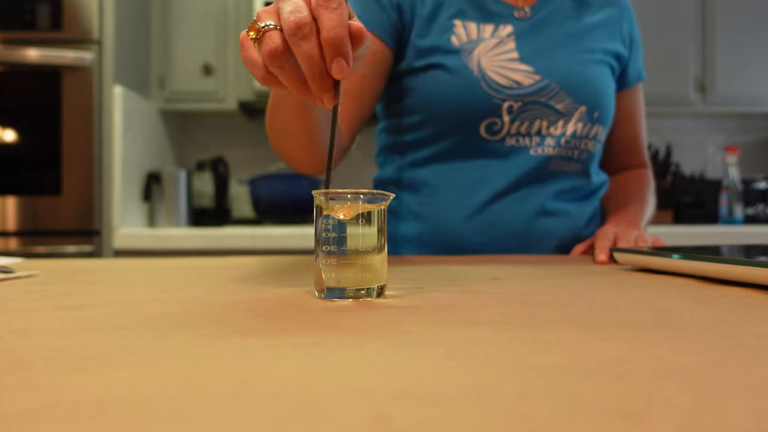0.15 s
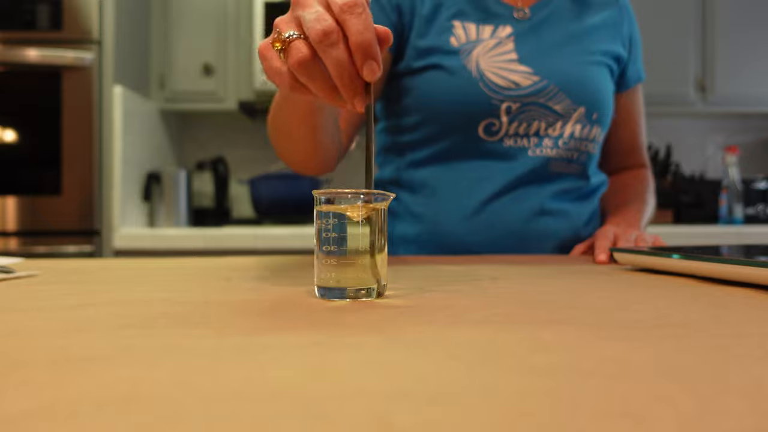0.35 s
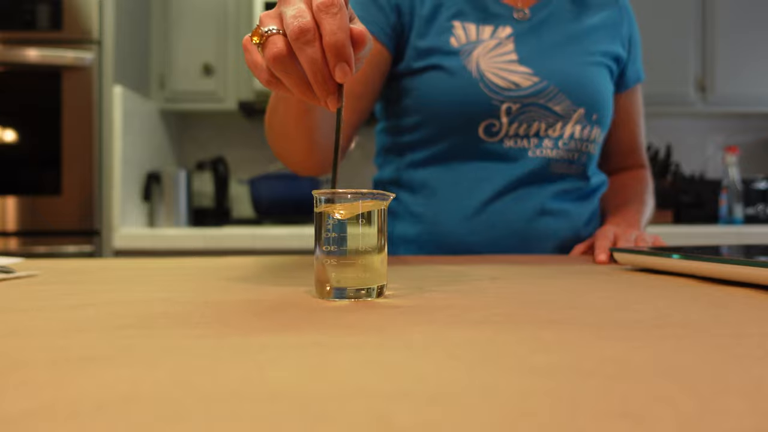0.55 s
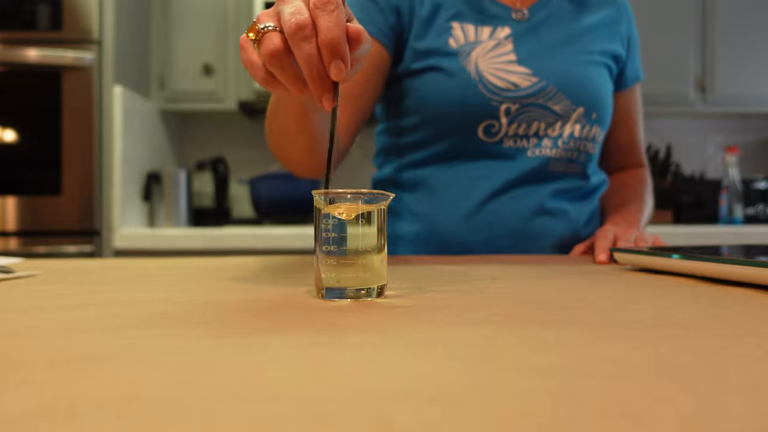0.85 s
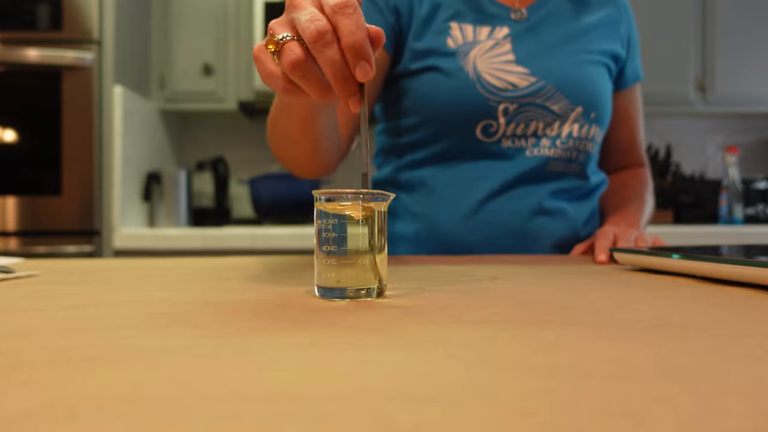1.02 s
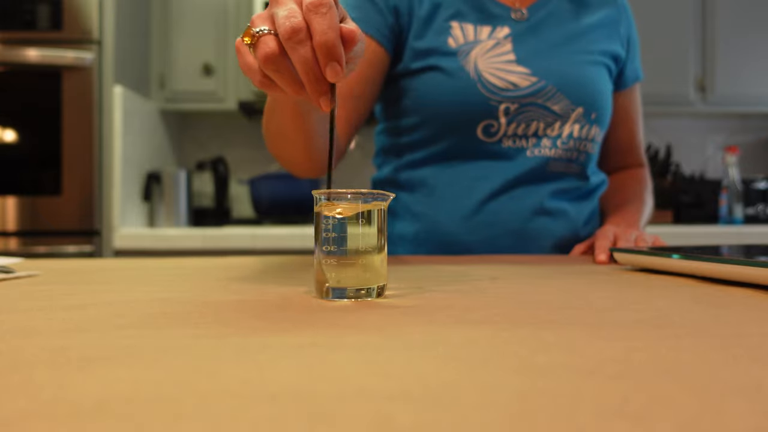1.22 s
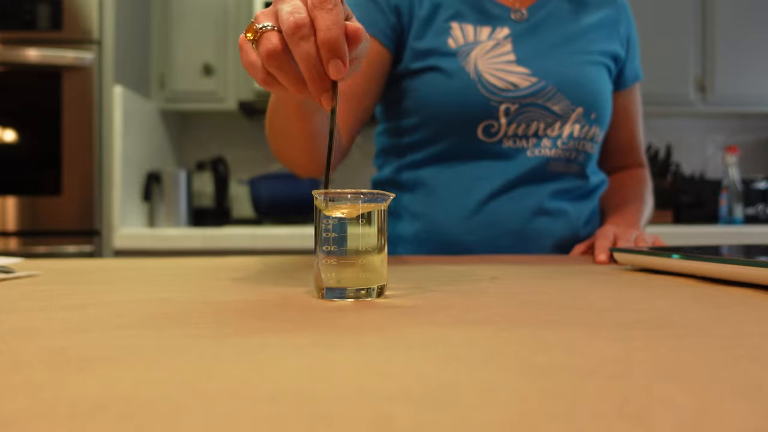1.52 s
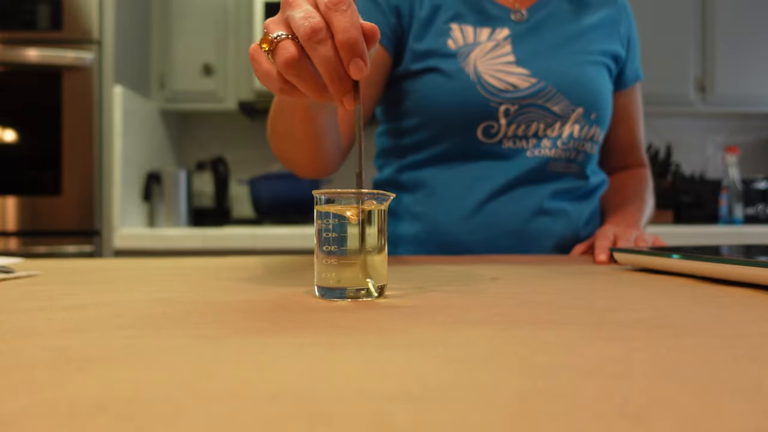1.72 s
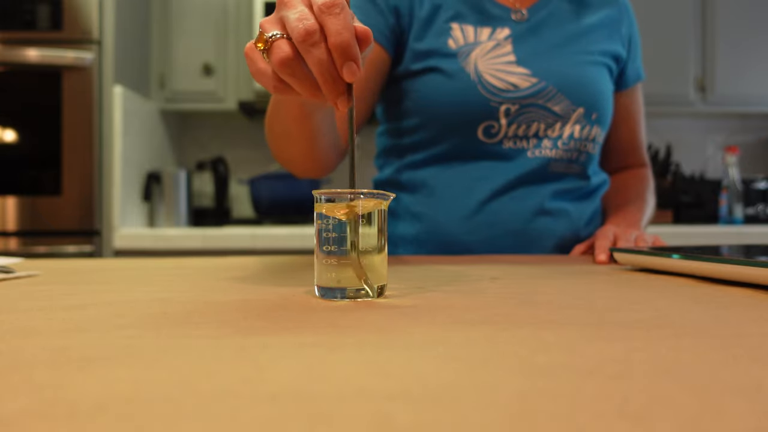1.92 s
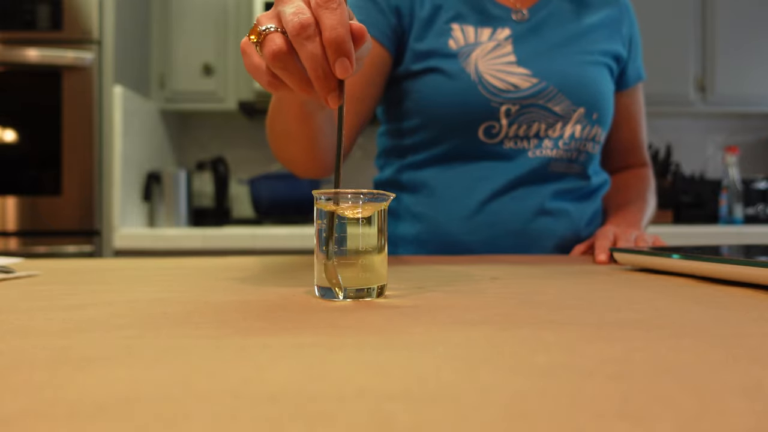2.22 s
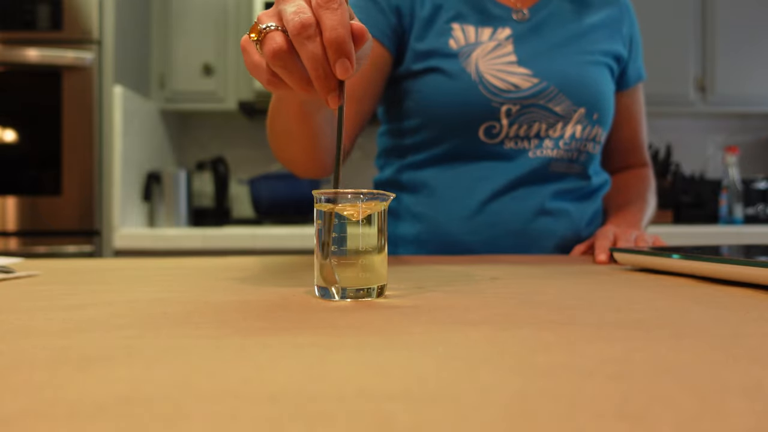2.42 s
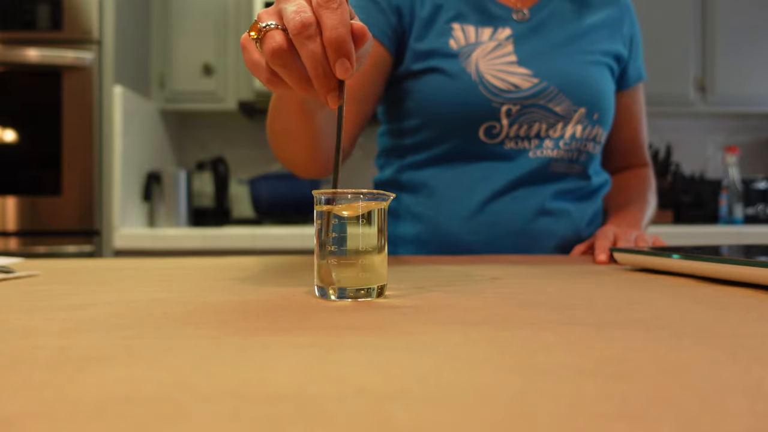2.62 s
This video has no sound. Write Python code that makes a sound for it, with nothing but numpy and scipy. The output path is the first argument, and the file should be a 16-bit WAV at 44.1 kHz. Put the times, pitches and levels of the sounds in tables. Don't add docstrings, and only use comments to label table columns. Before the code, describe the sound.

Thin metal rod clinking rapidly inside a small glass beaker of liquid while stirring, then faint ticks

```python
import sys
import numpy as np
from scipy import signal
from scipy.fft import rfft, irfft, next_fast_len
from scipy.io import wavfile
from scipy.ndimage import uniform_filter1d, map_coordinates

SR = 44100
rng = np.random.default_rng(int(sys.argv[2]) if len(sys.argv) > 2 else 0)


def gain_from_decibels(decibels):
    exponent = np.asarray(decibels, float) / 20
    return 10 ** exponent


def store_wav(level_fs):
    pcm = np.round(np.clip(np.atleast_2d(level_fs), -1, 1) * 32767)
    wavfile.write(sys.argv[1], SR, pcm.T.astype(np.int16))


N = 121275
LEAD = SR // 5

# start_s, wall_db, shoulder_db, rim_db, high_rim_db
EARLIER_CLINK = (-.03, -31, -32, -35, -38)
# start_s, wall_db, shoulder_db, rim_db, high_rim_db
CLINKS = [(0.1017, -24.5, -23, -34, -45), (.1055, -45, -25.5, -38, -44), (0.1758, -31, -37, -47, -48),
          (0.2073, -29.5, -24, -29, -32), (.2220, -16.5, -21, -20, -27.5), (0.2665, -20.5, -20.5, -21, -36),
          (0.2693, -17.5, -20, -14, -24), (.4402, -26, -23, -33, -37.5), (0.5543, -22.5, -23.5, -33, -31),
          (.5662, -17.5, -16.5, -14, -21.5), (.611, -26, -30, -24.5, -43), (.6157, -21.5, -29, -17.5, -35),
          (.7848, -17.5, -25.5, -24, -37), (0.8667, -40, -49, -45, -50), (0.8959, -21.5, -20.5, -39, -32.5),
          (.9086, -14, -23, -16, -24.5), (.9546, -17.5, -22.5, -43, -40), (0.9606, -16.5, -19, -21.5, -35),
          (1.1333, -12.5, -14.5, -16, -19.5), (1.1398, -24, -26, -30, -37), (1.1854, -29, -41, -34, -47),
          (1.2161, -24, -21.5, -33, -34), (1.2323, -17, -22, -28, -32), (1.4632, -24.5, -27.5, -24, -38),
          (1.4678, -24.5, -22, -47, -37.5), (1.5312, -43, -47, -37.5, -50), (1.565, -20, -23, -30.5, -32.5),
          (1.5795, -13.5, -21.5, -20, -28.5), (1.8838, -10.5, -12, -12, -18)]
# start_s, base_db, shoulder_db, wall_db, free_ring_share (of t60)
KNOCKS = [
    (0.001, -31, -36.5, -44, 0.95),
    (0.3250, -16, -21, -58, .9),
    (0.408, -26, -39, -37, .4),
    (0.6668, -16, -23, -33.5, 0.46),
    (0.7512, -36, -42.5, -45, .5),
    (1.0129, -16.5, -23.5, -33, 0.51),
    (1.6995, -19, -32, -37, 0.5),
]
# start_s, pitch_hz, level_db, t60_s
THUDS = [(.0, 2214, -36, .35), (.177, 2190, -36, .3), (.222, 2350, -25, .03), (.27, 1050, -38, .04),
         (.34, 2215, -40, .9), (.445, 2222, -39, .4), (.566, 2100, -24, .045), (.613, 1100, -40, .04),
         (.67, 770, -37, .04), (.67, 1650, -32, .035), (.685, 2205, -37, .6), (.71, 1300, -42, .04),
         (.785, 1500, -39, .03), (.8, 2210, -36, .4), (.87, 2300, -38, .05), (.908, 2110, -23, .06),
         (.96, 850, -40, .04), (1.014, 220, -33, .06), (1.014, 1650, -35, .04), (1.134, 300, -36, .05),
         (1.134, 1550, -33, .05), (1.186, 2350, -34, .05), (1.232, 2050, -26, .045), (1.255, 730, -43, .03),
         (1.445, 1500, -43, .02), (1.533, 2180, -39, .5), (1.553, 2185, -33, .7), (1.57, 1080, -41, .04),
         (1.579, 2170, -25, .09), (1.655, 330, -39, .05), (1.699, 300, -28, .06), (1.699, 200, -31, .06),
         (1.699, 1680, -33, .04), (1.705, 2195, -39, .8), (2.236, 2195, -51, .7), (2.413, 1200, -47, .03)]
# start_s, peak_db
TICKS = [(.005, -41), (0.0572, -30), (0.0686, -32), (0.144, -37), (.4788, -40), (0.515, -49), (.5262, -43),
         (0.691, -28), (1.2672, -34), (1.3848, -40.5), (1.4028, -26.5), (1.423, -44), (1.446, -28),
         (1.484, -31), (1.498, -37), (1.547, -34), (1.6576, -48), (1.8181, -29), (1.8437, -32.5),
         (1.859, -29), (2.0277, -40), (2.0561, -50), (2.0753, -33), (2.17, -46), (2.2079, -41.5),
         (2.2333, -33.5), (2.247, -39), (2.2622, -38.5), (2.3425, -47), (2.351, -41), (2.4072, -40),
         (2.42, -52), (2.436, -43.5), (2.4539, -37.5), (2.4819, -41), (2.4996, -45), (2.5343, -45),
         (2.6277, -32), (2.635, -35), (2.672, -40.5), (2.688, -51), (2.7301, -47)]
# time_s, pressure_db
GRAZE = [(0.0, -52), (.3, -54), (.6, -51.5), (.87, -51.5), (1.02, -57), (1.1, -68.5), (1.22, -49),
         (1.38, -69.5), (1.52, -47.5), (1.63, -64), (1.8, -58), (1.91, -53.5), (2.2, -61), (2.3, -60.5),
         (2.45, -60), (2.6, -63.5), (2.75, -62.5)]
TURNS_S = [-.12, .222, .562, .905, 1.231, 1.578, 1.878, 2.3, 3.1]
# pitch_hz, level_db, t60_s, liquid_bend_percent
WALL = [(5915, 0, .33, 1.6), (5855, -8, .5, .9)]
SHOULDER = [(8860, -9, .1, 2.3), (8905, 0, .13, .25), (8950, -9, .22, .2), (9060, -13, .13, 0)]
RIM = [(9545, 0, .11, .65), (9500, -9, .22, .3)]
HIGH_RIM = [(10765, 0, .13, .5), (10710, -7, .22, .5), (14170, -6, .075, 1.8), (14060, -12, .12, 1.2),
            (15730, -13, .08, .2)]
OVAL = [(2212, 0, .6, 1.2), (2192, -5, .5, .6)]
BASE = [(4262, 0, .15, .6), (4330, -7, .07, -1.1), (4200, -11, .2, .9), (12000, -25, .09, .3),
        (12850, -26, .05, .3)]
TIP = [(3090, -6.5, 0.021, 0), (4425, 0, 0.024, 0), (4237, -3.5, 0.037, 0), (6480, -11, 0.019, 0.0056),
       (7800, -9, 0.015, 0), (8920, -9, 0.085, 0.0033), (10800, -20, 0.059, 0), (13000, -18, .015, 0)]
# freq_hz, level_db
CRACK = [(200, -32), (700, -6), (1400, -2.5), (2400, 6), (5000, 0), (9000, 4.5), (13000, -8.5),
         (16000, -15)]
# centre_hz, width_hz, level_db
GLASS = [(2221, 41, 8.5), (4160, 190, 1), (6050, 72, 1), (3030, 2700, -25), (6560, 380, -16),
         (8920, 350, 2), (9580, 114, -3), (10600, 98, -5), (14000, 900, -29)]
# pitch_hz, rms_db
HUM = [(56.6, -48.5), (60, -65), (120, -55.5), (180, -64)]
# freq_hz, density_db (per Hz)
AIR = [(20, -6), (90, -10), (200, -3), (400, -4.5), (1000, -17.5), (2400, -27.5), (8000, -35), (16000, -40)]
# freq_hz, t60_s
ROOM = [(500, 0.86), (4000, 0.43), (14000, 0.26)]

LEAN_DB_PER_S = 451


def unit(x):
    return x / np.sqrt(np.mean(x ** 2) + 1e-20)


def along(points, hz):
    f, v = np.transpose(points)
    return np.interp(np.log(hz + 1), np.log(f + 1), v)


def wobble(rate_hz, size=N):
    knots = rng.standard_normal(int(size * rate_hz / SR) + 4)
    return map_coordinates(knots, [np.arange(size) * rate_hz / SR])


def filtered(x, response):
    m = next_fast_len(len(x) + 8192)
    return irfft(rfft(x, m) * response(np.fft.rfftfreq(m, 1 / SR)), m)[:len(x)]


def liquid_load():
    pile_before, pile_after, ripple_at = .1, .11, .17
    ripple, waver = .25, .1
    turn = np.interp((np.arange(N + SR) - LEAD) / SR, TURNS_S, np.arange(len(TURNS_S)))
    away = (turn + .5) % 1 - .5
    width = np.where(away < 0, pile_before, pile_after)
    stirring = turn < len(TURNS_S) - 2.5
    pile = np.exp(-(away / width) ** 2) * stirring
    shift = ripple * np.cos(4 * np.pi * (turn - ripple_at)) - pile + waver * wobble(30.15, size=N + SR)
    loss_db_per_s = LEAN_DB_PER_S * pile * (away < 0)
    return np.cumsum([shift / 100, loss_db_per_s], axis=1) / SR


def ring(modes, db, load):
    scatter_db, attack_s = 2, 0.000089
    shift, loss_db = load - load[:, :1]
    t = np.arange(len(shift)) / SR
    hz, level_db, t60_s, bend = np.transpose(modes)[:, :, None]
    start_db = db + level_db + scatter_db * rng.standard_normal(hz.shape)
    gain = gain_from_decibels(start_db - 60 * t / t60_s - loss_db)
    tones = gain * np.sin(2 * np.pi * hz * (t + bend * shift))
    return tones.sum(0) * (1 - np.exp(-t / attack_s))


def add(out, start_s, x):
    at = LEAD + round(start_s * SR)
    out[at:at + len(x)] += x


def strike(out, load, start_s, *families):
    at = LEAD + round(start_s * SR)
    during = load[:, at:][:, :SR // 2]
    add(out, start_s, sum(ring(modes, db, during) for modes, db in families))


def crack(db):
    crack_s, splash_s, splash_db = 0.0092, 0.091, -16.5
    t = np.arange(4096) / SR
    contact = gain_from_decibels(db - 60 * t / crack_s)
    splash = gain_from_decibels(db + splash_db - 60 * t / splash_s)
    return (contact + splash) * rng.standard_normal(len(t))


def clinks(load, tones, bases, bursts):
    bounce_s, bounce_db = .008, -7
    last_s = -1
    for s, wall_db, shoulder_db, rim_db, high_db in [EARLIER_CLINK, *CLINKS]:
        oval_db = wall_db - 26.5 + 14 * (s < 0)
        strike(tones, load, s, (WALL, wall_db - 8.5), (SHOULDER, shoulder_db), (RIM, rim_db),
               (HIGH_RIM, high_db), (OVAL, oval_db))
        strike(bases, load, s, (BASE, shoulder_db - 17))
        add(bursts, s, crack(max(shoulder_db, rim_db) - 1 + bounce_db * (s - last_s < bounce_s)))
        last_s = s


def knocks(load, tones, bases, dull):
    for s, base_db, shoulder_db, wall_db, free in KNOCKS:
        damped_base = np.multiply(BASE, [1, 1, free, 1])
        strike(bases, load, s, (damped_base, base_db - 3))
        strike(tones, load, s, (SHOULDER, shoulder_db), (OVAL, wall_db - 4), (WALL, wall_db - 6),
               (HIGH_RIM, shoulder_db - 14))
        add(dull, s, crack(base_db + 2.5))


def thuds(load, tones):
    for s, hz, db, t60_s in THUDS:
        strike(tones, load, s, ([(hz, 0, t60_s, 0)], db))


def ticks(load, tones, dull):
    skid_s, skid_loss_db = 0.005, 9
    for s, db in TICKS:
        delays_s = np.cumsum(skid_s * rng.random(size=3)) * np.sign(np.arange(3))
        for k, late_s in enumerate(delays_s):
            strike(tones, load, s + late_s, (TIP, db - 5 - skid_loss_db * k))
            add(dull, s + late_s, crack(db - 21 - skid_loss_db * k))


def beaker(load):
    knock_dull_hz = 5500
    wall_flutter_db, wall_flutter_hz = 1.5, 35
    base_flutter_db, base_flutter_hz = 3, 150
    tones, bases, bursts, dull = np.zeros((4, N + SR))
    clinks(load, tones, bases, bursts)
    knocks(load, tones, bases, dull)
    thuds(load, tones)
    ticks(load, tones, dull)
    bursts = bursts + filtered(dull, lambda hz: 1 / (1 + 1j * hz / knock_dull_hz) ** 2)
    tones = tones * gain_from_decibels(wall_flutter_db * wobble(wall_flutter_hz, size=N + SR))
    bases = bases * gain_from_decibels(base_flutter_db * wobble(base_flutter_hz, size=N + SR) - 1.0)
    cracks = filtered(bursts, lambda hz: gain_from_decibels(along(CRACK, hz)))
    return (tones + bases + cracks)[LEAD:LEAD + N]


def glass_response(hz):
    total = 0
    for k, (centre_hz, width_hz, db) in enumerate(GLASS):
        drag = 1j * hz * width_hz
        total = total + (-1) ** k * gain_from_decibels(db) * drag / (centre_hz * centre_hz - hz * hz + drag)
    return total


def graze(load):
    slips_per_s, spread_db, smallest_slip = 2300, 7, .08
    level_db, rub_db = -1, 13
    time_s, pressure_db = np.transpose(GRAZE)
    chance, size, sign = rng.random((3, N))
    slips = np.clip((slips_per_s / SR - chance) * SR / 30, 0, 1)
    slips = slips * gain_from_decibels(-spread_db * np.log(size + smallest_slip)) * np.sign(sign - .5)
    lean = np.gradient(load[1])[LEAD:LEAD + N] * SR / LEAN_DB_PER_S
    drag_db = np.interp(np.arange(N) / SR, time_s, pressure_db) + level_db
    drag_db = drag_db + rub_db * uniform_filter1d(lean, size=900)
    return gain_from_decibels(drag_db) * unit(filtered(slips * gain_from_decibels(0.77 * wobble(9.4)), glass_response))


def slosh():
    centre_hz, width_hz, level_db = 390, 55, -54
    end_s, fade_s = .9, .06
    band = filtered(rng.standard_normal(N), lambda hz: np.exp(-((hz - centre_hz) / width_hz) ** 2))
    fade = 1 + np.exp((np.arange(N) / SR - end_s) / fade_s)
    return gain_from_decibels(level_db + 1.2 * wobble(6.1)) * unit(band) / fade


def kitchen():
    t = np.arange(N) / SR
    hum = np.zeros(N)
    for hz, rms_db in HUM:
        level = np.sqrt(2) * gain_from_decibels(rms_db + 0.54 * wobble(22.1))
        hum += level * np.sin(2 * np.pi * hz * t + 0.088 * wobble(3.5))
    air_level = gain_from_decibels(-47 + 0.2 * wobble(1.78))
    air = unit(filtered(rng.standard_normal(N), lambda hz: gain_from_decibels(along(AIR, hz))))
    return hum + air_level * air


def room(x):
    hz, t, z = signal.stft(rng.standard_normal(SR // 2), SR, nperseg=256)
    decay = gain_from_decibels(-60 * t / along(ROOM, hz)[:, None])
    tail = signal.istft(z * decay, SR, nperseg=256)[1]
    delayed = np.pad(x, (130, 0))
    return signal.fftconvolve(delayed, tail / np.linalg.norm(tail))[:N]


def scene():
    room_db = -14.5
    load = liquid_load()
    glass = beaker(load) + graze(load)
    return (glass + gain_from_decibels(room_db) * room(glass) + slosh() + kitchen())[None]


def low_pass(x):
    return signal.sosfilt(signal.butter(12, 16820, fs=SR, output="sos"), x)


def record(dry):
    top_hz = 16250
    mix = filtered(dry[0], lambda hz: 1 / (1 + (hz / top_hz) ** 90))[None]
    return low_pass(mix)


dry = scene()
out = record(dry)
store_wav(out)
```